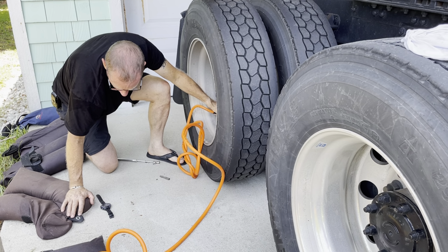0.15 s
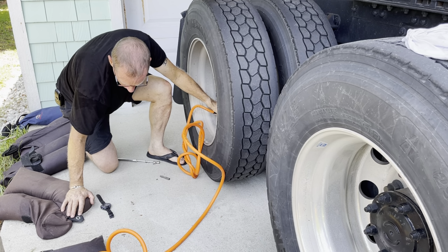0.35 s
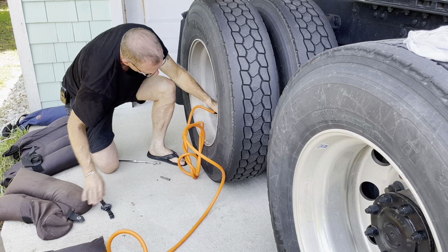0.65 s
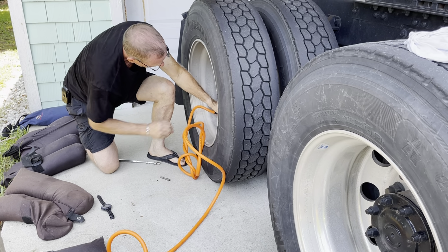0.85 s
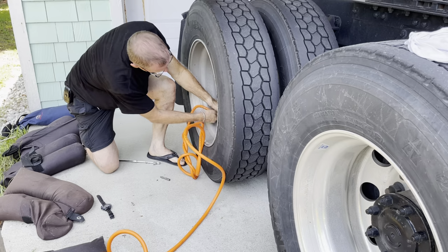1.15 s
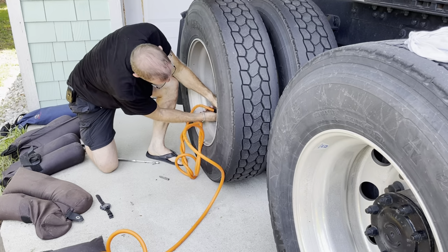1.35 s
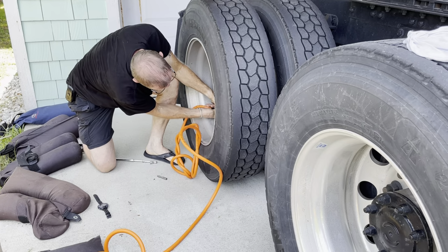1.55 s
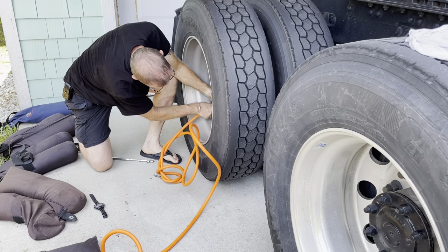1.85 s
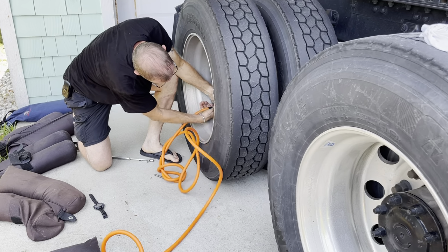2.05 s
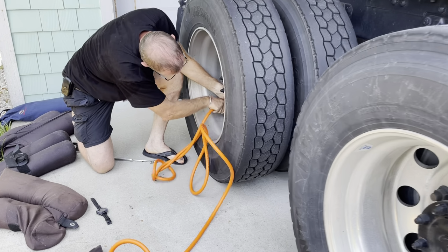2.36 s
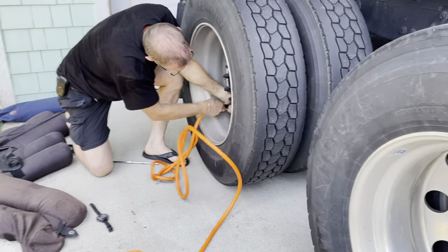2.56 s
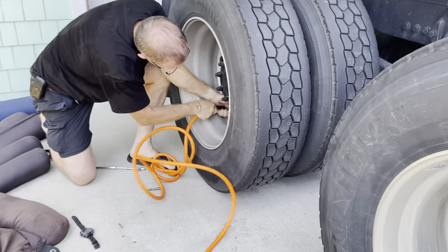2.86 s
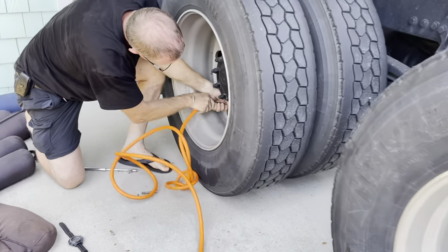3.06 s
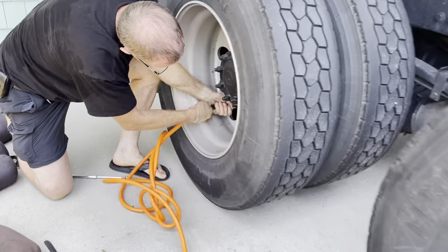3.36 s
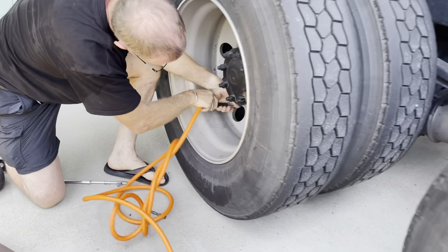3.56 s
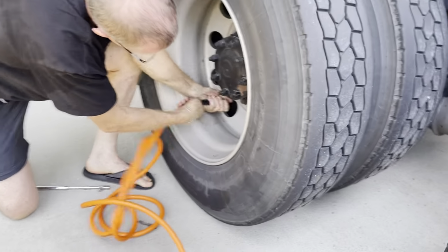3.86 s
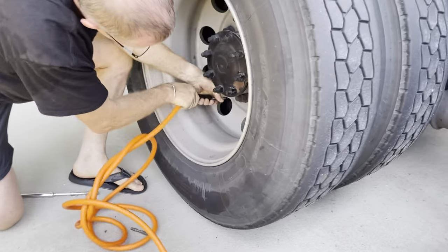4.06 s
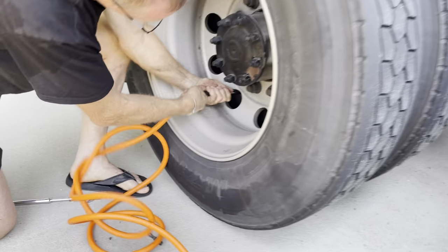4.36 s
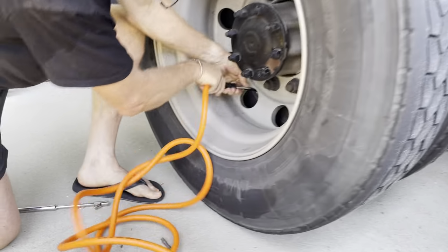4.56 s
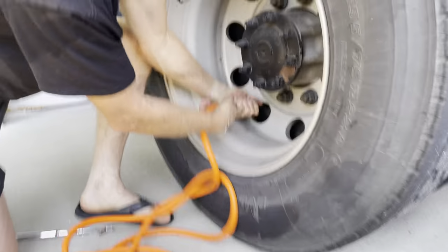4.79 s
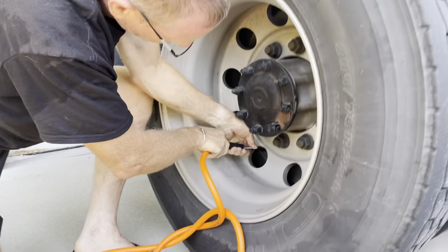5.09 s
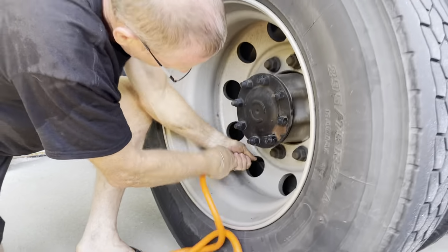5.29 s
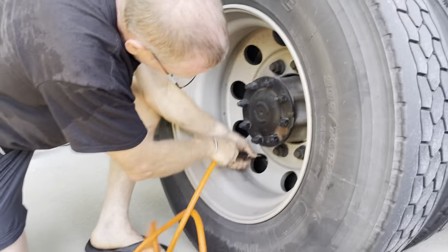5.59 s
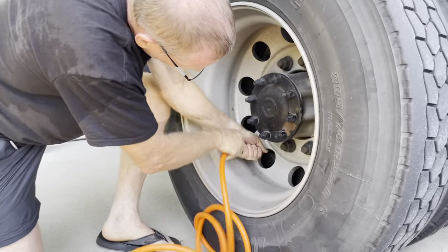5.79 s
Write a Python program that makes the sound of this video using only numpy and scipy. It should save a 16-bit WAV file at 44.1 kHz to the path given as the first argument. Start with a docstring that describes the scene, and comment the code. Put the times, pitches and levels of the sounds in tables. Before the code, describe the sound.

Rough idling truck diesel throughout; midway an air chuck starts hissing and fluttering, squeaks for an instant, then clacks against the wheel near the end.

```python
"""A six-cylinder diesel truck drones and clatters outdoors while an air chuck is worked onto a tire valve.
Air leaks faintly from the hose, then hisses unevenly and chirps past the seal; the chuck knocks on the wheel.
The engine is tones on multiples of its cycle plus noise that swells at each firing; the air is coloured
noise; the knock rings the modes of the wheel. A pair of microphone ports comes closer, past another tire."""
import sys
import numpy as np
from scipy import signal
from scipy.fft import rfft, irfft
from scipy.io import wavfile

SR = 44100
rng = np.random.default_rng(int(sys.argv[2]) if len(sys.argv) > 2 else 0)


def unload_audio(sound):
    """Save the sound as a 16-bit wav file, at the path given as the first command line argument."""
    columns = np.transpose(np.atleast_2d(sound))
    # keep every value between -1 and 1, then stretch to whole-number steps
    steps = np.round(np.clip(columns, -1, 1) * 32767)
    wavfile.write(sys.argv[1], SR, steps.astype(np.int16))


N = 261513
CYCLE_HZ = 5.002   # full engine cycles per second
TIME = np.arange(N) / SR
HZ = np.maximum(np.arange(N // 2 + 1) * SR / N, 1)   # frequency bins, kept above 0 for the logarithm


def from_db(db):
    """Decibels to gain."""
    return 10 ** (np.asarray(db) / 20)


def rms_one(x):
    """Scale to unit rms."""
    return x / np.sqrt(np.mean(x ** 2) + 1e-20)


def in_time(rows):
    """Columns of a curve table at every sample."""
    s, *columns = np.transpose(rows)
    return [np.interp(TIME, s, column) for column in columns]


def on_hz(rows):
    """Columns of a spectrum table at every frequency bin, along log frequency."""
    hz, *columns = np.transpose(rows)
    return [np.interp(np.log(HZ), np.log(hz), column) for column in columns]


def colour(x, gain):
    """Filter by a gain for each frequency bin."""
    return irfft(rfft(x) * gain, N)


def resonance(hz, width_hz):
    """Gain of a narrow peak, for each frequency bin."""
    return 1 / (1 + ((HZ - hz) / width_hz) ** 2)


def drift(rate):
    """Slow chance of spread 1: noise through two one-pole low-passes at rate Hz, one step per 40 samples."""
    pole = np.exp(-80 * np.pi * rate / SR)
    noise = rng.standard_normal(N // 40 + 2002)
    slow = signal.lfilter([1], [1, -2 * pole, pole * pole], noise)[2000:]   # drop the run-in
    return np.interp(np.arange(N) / 40, np.arange(len(slow)), rms_one(slow))


def at_place(near, values):
    """Blend from the value afar (near = 0) to the value beside the wheel (near = 1)."""
    near = np.clip(near, 0, 1)
    return (1 - near) * values[0] + near * values[1]


def drone(near, waver_db, phase_spread):
    """Engine tones stem from the same pulses; higher ones arrive later, so each throb glides up."""
    # Multiples of the cycle that sound
    orders = [9, 12, 15, 16, 18, 20, 22, 24, 25, 28, 33, 34, 36, 52, 68]
    # Exhaust and block tone on each multiple: level afar/dB, level beside the wheel/dB
    tones = [(-51, -60), (-35.5, -41), (-45, -64), (-55, -62), (-50.5, -34), (-39.5, -68), (-41.5, -42),
             (-37.5, -43), (-48, -68), (-52, -59), (-62, -42.5), (-62, -46), (-41, -49.5), (-60, -43),
             (-50, -48.5)]
    lag_s, centre_hz, glide_s_per_hz = .045, 105, .0013
    out = np.zeros((3, N))
    phases = rng.standard_normal((len(tones), 3, 1))
    phases[:, 0] *= phase_spread   # the direct path keeps the pulses tighter
    for multiple, levels_db, phase in zip(orders, tones, phases):
        hz = multiple * CYCLE_HZ
        cycles = hz * (TIME - lag_s) - glide_s_per_hz * (hz - centre_hz) ** 2 / 2
        level = from_db(at_place(near, levels_db) + waver_db * drift(0.78))
        out += level * np.sqrt(2) * np.cos(2 * np.pi * cycles + phase)
    return out


def hums(waver_db, wander):
    """Engine tones that fade and swell along the walk, wavering in level and in phase (wander in radians)."""
    # Multiples of the cycle, lowest first
    hum_orders = (30, 46, 76, 92)
    # Fades of these tones: t/s, then level/dB of each, lowest first
    hum_levels = [(0, -44, -54, -37.5, -50), (0.8, -43, -54, -36.5, -52), (2.2, -42, -54, -36.5, -56),
                  (2.6, -38, -54, -41, -54), (2.85, -37, -54, -48, -39.5), (3.1, -37, -50, -48, -39),
                  (3.35, -37, -44, -47, -38), (3.6, -36, -40, -52, -48), (4.2, -44, -39, -48, -46),
                  (4.65, -48, -45, -42, -47), (5.4, -48, -42, -40, -45), (5.93, -50, -42, -44, -46)]
    out = 0
    for multiple, db in zip(hum_orders, in_time(hum_levels)):
        phase = rng.uniform(0, 2 * np.pi) + wander * drift(3.6)
        level = from_db(db + waver_db * drift(5.2))
        out = out + level * np.sqrt(2) * np.cos(2 * np.pi * multiple * CYCLE_HZ * TIME + phase)
    return out


def clatter(near, swell_depth, swell_s, swell_top_hz):
    """Engine noise, partly the same in every cycle; below the treble it swells at each firing."""
    # Share of the noise that returns alike every cycle: f/Hz, share/0-1
    repeat_share = [(40, 0.1), (500, 0.58), (1200, 0.48), (3000, 0.024)]
    # Strength of each firing in turn: level/dB
    cylinder_db = [3.1, 1.8, 5.7, 4.2, 4, 5.3]
    # Relative noise spectrum: f/Hz, density afar/dB per Hz, density beside the wheel/dB per Hz
    engine_spectrum = [(30, -25, -35), (49.8, -10.5, -4), (106, -4, -4.5), (200, -8, -7), (272, -6, -8.5),
                       (320, -8, -7), (433, -6, -4), (466, -3.5, -6), (556, -4.5, -5.5), (572, -6, -7.5),
                       (690, -7.5, 0.5), (734, -0.6, -3), (837, -5, -6.5), (1010, -7.5, -7.5),
                       (2140, -14, -13), (3380, -19.5, -20.5), (3920, -27, -26.5), (6100, -30, -35.5),
                       (15900, -46.5, -66)]
    # Overall engine noise: t/s, level/dB
    load = [(0, -24.5), (1, -24.5), (1.9, -24), (2.6, -24), (3.6, -24.5), (4.4, -25), (5.1, -25),
            (5.93, -25)]
    cycle = round(SR / CYCLE_HZ)
    same = rng.standard_normal((3, cycle))[:, np.arange(N) % cycle]
    repeats = np.clip(on_hz(repeat_share)[0], 0, 1)
    fresh = rng.standard_normal((3, N))
    noise = colour(same, np.sqrt(repeats)) + colour(fresh, np.sqrt(1 - repeats))

    firing_hz = CYCLE_HZ * len(cylinder_db)
    turn = TIME * firing_hz
    firing = from_db(cylinder_db)[turn.astype(int) % len(cylinder_db)]
    since = turn % 1 / firing_hz   # seconds since the last firing
    swell = swell_depth * firing * np.exp(-since / swell_s)
    noise = noise + swell * colour(noise, 1 / (1 + (HZ / swell_top_hz) ** 2))
    mixed = at_place(near, [colour(noise, from_db(db)) for db in on_hz(engine_spectrum)])
    return from_db(in_time(load)[0]) * rms_one(mixed)


def clack(near):
    """Once a cycle the block rings briefly: swells of narrow noise, each at its own moment in the cycle."""
    # Block rings: f/Hz, width/Hz, level afar/dB, level beside the wheel/dB,
    # moment in the cycle afar/s, moment beside the wheel/s
    rings = [(766, 92, -28, -29, .161, .148), (790, 92, -30, -37, .03, .03), (790, 92, -30, -38, .13, .13),
             (210, 90, -30, -38, .005, .005), (210, 90, -28, -33, .074, .076),
             (210, 90, -30, -34, .11, .11), (112, 45, -30, -35, .045, .035), (112, 45, -30, -35, .143, .1)]
    span = .6   # half length of a swell in s (to 1/e) times its width in Hz
    out, white = 0, rng.standard_normal((3, N))
    for hz, width_hz, far_db, near_db, *moment_s in rings:
        tone = rms_one(colour(white, resonance(hz, width_hz) ** 2))
        off_cycles = ((TIME - at_place(near, moment_s)) * CYCLE_HZ + .5) % 1 - .5
        swell = np.exp(-(off_cycles / CYCLE_HZ * width_hz / span) ** 2)
        out = out + from_db(at_place(near, (far_db, near_db))) * tone * swell
    return out


def bounce(x, low_hz, top_hz):
    """A nearby tire adds a dull echo without deep bass; its path changes, so notches move through the drone."""
    # Echo off the tire on the way: t/s, strength/0-1, extra path/m
    tire_echo = [(0, 0.1, 1.64), (2.4, .05, 1.6), (2.8, 0.35, 1.6), (3.3, 0.5, 1.5), (3.6, .75, 1.27),
                 (4.2, .75, 1.25), (4.6, .1, 1.3), (5.93, 0.2, 1.27)]
    strength, path_m = in_time(tire_echo)
    strength = np.clip(strength, 0, 1)
    dull = colour(x, 1 / (1 + (HZ / top_hz) ** 4) / (1 + (low_hz / HZ) ** 4))
    delay_s = path_m / 343   # speed of sound in m/s
    late = np.array([np.interp(TIME - delay_s, TIME, path) for path in dull])
    # turn the echoed band down so that the echo does not simply add power
    excess = 1 - 1 / np.hypot(1, strength)
    return x + strength * late - excess * (dull + strength * late)


def patchy(x, low_hz, top_hz, count, patch_db, rate):
    """Turbulence on the way: narrow bands of the sound swell and sink, each in its own time."""
    edges, out = np.geomspace(low_hz, top_hz, count + 1), x
    for band in zip(edges, edges[1:]):
        part = signal.sosfilt(signal.butter(1, band, "band", fs=SR, output="sos"), x)
        out = out + (from_db(patch_db * drift(rate)) - 1) * part
    return out


def leak(split_hz, flutter_db, dull_waver_db):
    """Jet noise from hose and seal; both parts flutter, and the seal's duller part wavers as the gap changes."""
    # Faint leak of the handled hose: t/s, level/dB
    hose_leak = [(0, -50), (1.22, -54), (1.29, -49), (2.45, -52), (2.82, -60), (5.93, -55.5)]
    # Hiss past the chuck seal as the hands work it: t/s, level/dB
    seal_hiss = [(2.84, -60), (2.87, -44), (2.95, -45), (3.01, -36), (3.09, -33.5), (3.17, -37.5),
                 (3.27, -34.5), (3.5, -36), (3.6, -32.5), (3.73, -36), (3.8, -30.5), (3.89, -41),
                 (3.93, -34), (3.98, -41), (4.01, -33), (4.18, -34), (4.21, -35.5), (4.34, -35.5),
                 (4.55, -32), (4.75, -36), (4.79, -30), (4.93, -36), (5.02, -30.5), (5.07, -36.5),
                 (5.23, -30.5), (5.28, -36.5), (5.47, -30), (5.54, -33), (5.78, -30.5), (5.93, -35.5)]
    # Relative jet spectrum: f/Hz, density/dB per Hz
    jet_spectrum = [(2500, -30), (4000, -10), (6000, -5), (8000, -5), (9300, -3), (11000, -5), (12700, -7),
                    (14500, -2), (15600, 1.5)]
    hose_dull_db, seal_dull_db = 10, 0.3   # extra level of the duller part of each jet
    hose, seal = from_db(in_time(hose_leak)[0]), from_db(in_time(seal_hiss)[0])
    jet = rms_one(colour(rng.standard_normal((3, N)), from_db(on_hz(jet_spectrum)[0])))
    dull = colour(jet, 1 / (1 + (HZ / split_hz) ** 4))
    bright = jet - dull

    shared = drift(22)   # flutter common to both parts
    dull_seal = seal * from_db(seal_dull_db + dull_waver_db * drift(17.0))
    gain_dull = np.hypot(hose * from_db(hose_dull_db), dull_seal)
    gain_dull = gain_dull * from_db(flutter_db * (shared + drift(8.5)))
    gain_bright = np.hypot(hose, seal) * from_db(flutter_db * (shared + drift(6.1)))
    return gain_dull * dull + gain_bright * bright


def whistles(width_hz):
    """The jet at times catches an edge and sings faintly: noise in a narrow resonance."""
    # Whistles: start t/s, end t/s, f/Hz, level at the middle/dB
    edge_tones = [(1.2, 2.6, 7620, -64), (4.76, 4.86, 6700, -57)]
    out = np.zeros((3, N))
    for start, end, hz, db in edge_tones:
        tone = rms_one(colour(rng.standard_normal((3, N)), resonance(hz, width_hz)))
        out += from_db(db) * tone * np.sin(np.pi * np.clip((TIME - start) / (end - start), 0, 1))
    return out


def squeaks():
    """The seal slips and chirps: short rounded tones."""
    # Chirps at the seal: t/s, f/Hz, peak level/dB
    chirps = [(4.275, 5500, -46), (4.287, 5600, -47), (4.305, 5670, -40), (4.321, 5700, -39),
              (4.341, 5650, -42), (4.354, 5630, -38), (4.367, 5630, -40)]
    half_s = .004   # half length of a chirp, to 1/e
    out = 0
    for s, hz, db in chirps:
        since = TIME - s
        out = out + from_db(db) * np.exp(-(since / half_s) ** 2) * np.sin(2 * np.pi * hz * since)
    return out


def knock(spread_db, crack_s, crack_db, crack_tilt):
    """Each contact rings the wheel, every mode with its own strength and sign, and throws a bright crack."""
    # Chuck on wheel and its bounces: t/s, strength/dB
    contacts = [(5.632, -19), (5.6334, -9), (5.6375, -19), (5.643, -23), (5.651, -22), (5.659, -26)]
    # Modes of the wheel: f/Hz, relative level/dB, 60 dB decay time/s
    wheel_modes = [(730, 11, .055), (1055, 12, .05), (1300, 8, .03), (1580, 10, .03), (2170, 8, .025),
                   (2530, 8, .05), (2850, 4, .07), (3146, 14, .045), (3300, -2, .05), (3515, 3, .06),
                   (4140, 0, .05), (4800, -2, .025)]
    rise_cycles = 2.5   # a mode takes a few cycles to build up
    since = np.array([TIME - s for s, db in contacts])
    strength = from_db([[db] for s, db in contacts]) * (since >= 0)
    since = np.maximum(since, 0)
    noise = signal.lfilter([1, -crack_tilt], [1], rng.standard_normal(N))
    crack = from_db(crack_db) * noise * np.sum(strength * np.exp(-since / crack_s), 0)

    ring = 0
    for hz, db, t60 in wheel_modes:
        sign = rng.choice([-1, 1], len(contacts))
        share = from_db(db + spread_db * rng.standard_normal(len(contacts))) * sign
        shape = (1 - np.exp(-since * hz / rise_cycles)) * from_db(-60 * since / t60)
        ring = ring + share @ (strength * shape * np.sin(2 * np.pi * hz * since))
    return crack + strength.max() * ring / abs(ring).max()   # the hardest blow sets the peak of the ring


def ports(paths, close):
    """Two ports a little apart hear a direct path, each a scattered path of its own, and direct-only sound."""
    # Share of the power that is alike at both ports: f/Hz, share/0-1
    likeness = [(60, 1), (300, 0.84), (700, 0.5), (1500, 0.28), (2200, 0), (3200, 0.66), (5000, 0.55),
                (6800, 0.71), (8200, 1), (9700, 0.76), (11600, 1), (13200, 0.9), (15200, 1)]
    # Phase by which the left port leads: f/Hz, lead/rad
    left_lead = [(0, 0), (690, -1.4), (1380, -1.8), (2500, -5.6), (3360, -6.0), (4130, -6.4), (5170, -5.7),
                 (6630, -7.2), (7670, -9.2), (8870, -9.7), (10400, -12.1), (12300, -12.8), (14000, -15.2),
                 (15500, -16.0)]
    # Balance of the ports: f/Hz, left minus right level/dB
    balance = [(60, -1.5), (110, -1), (200, -1.5), (380, -3), (700, -4), (1290, -3.5), (2380, 0), (4400, 3),
               (8120, 1), (15000, -1)]
    direct, *scattered = rfft(paths)
    alike = np.clip(on_hz(likeness)[0], 0, 1)
    lead = np.interp(HZ, *np.transpose(left_lead))
    side = np.array([[.5], [-.5]])   # half of each difference to the left, half to the right
    common = (np.sqrt(alike) * direct + rfft(close)) * np.exp(1j * lead * side)
    both = common + np.sqrt(1 - alike) * np.array(scattered)
    return irfft(both * from_db(on_hz(balance)[0] * side), N)


def scene():
    """Engine, leak and knock as heard at the two ports."""
    # Walk towards the wheel: t/s, closeness/0-1 (0 afar, 1 beside the wheel)
    walk = [(0, 0.0072), (2.4, 0), (3.7, 0.94), (5.93, 0.88)]
    near = in_time(walk)[0]
    engine = drone(near, waver_db=2.0, phase_spread=0.26)
    engine = engine + clatter(near, swell_depth=0.35, swell_s=0.04, swell_top_hz=1400)
    engine = bounce(engine + clack(near), low_hz=208, top_hz=487)
    engine = patchy(engine, low_hz=900, top_hz=5000, count=24, patch_db=1.3, rate=10.0)
    air = leak(split_hz=7500, flutter_db=.35, dull_waver_db=1.5) + whistles(width_hz=30)
    close = hums(waver_db=1.8, wander=.3) + squeaks()
    close = close + knock(spread_db=1.5, crack_s=0.004, crack_db=-11.5, crack_tilt=.6)
    return ports(engine + air, close)


def record(dry):
    """The top is cut steeply by an elliptic low-pass at 15740 Hz."""
    return signal.sosfilt(signal.ellip(14, .5, 90, 15740, fs=SR, output="sos"), dry)


dry = scene()
out = record(dry)
unload_audio(out)
```